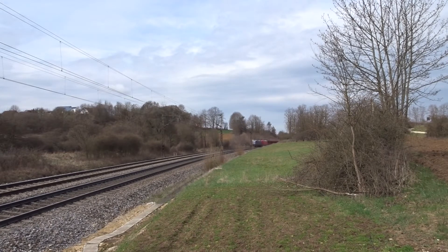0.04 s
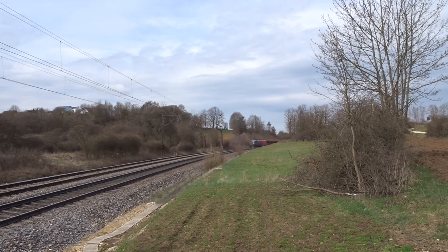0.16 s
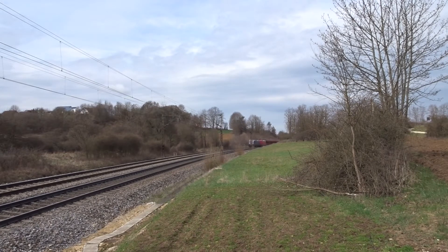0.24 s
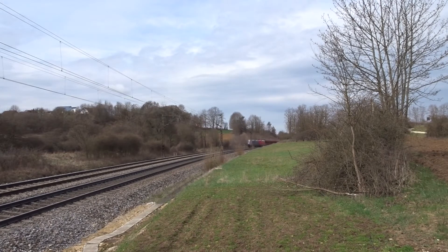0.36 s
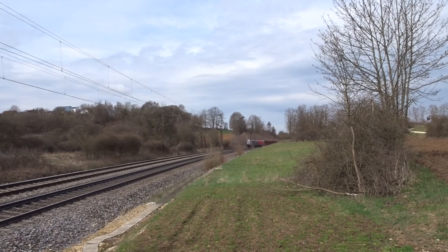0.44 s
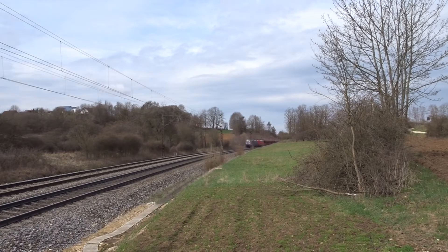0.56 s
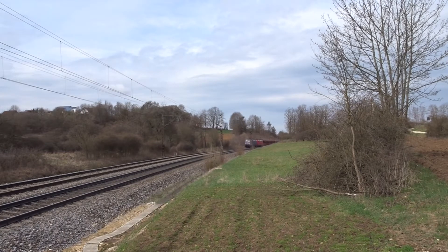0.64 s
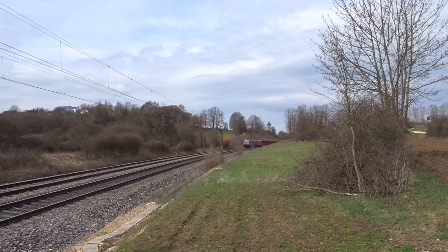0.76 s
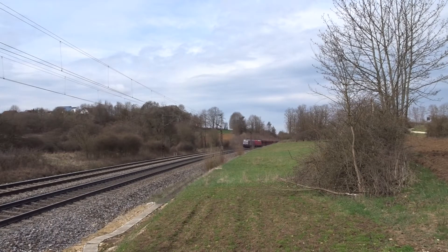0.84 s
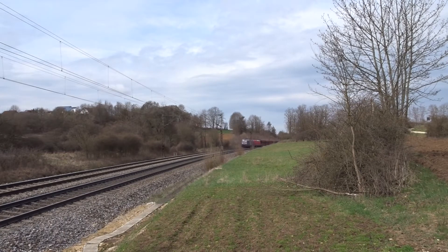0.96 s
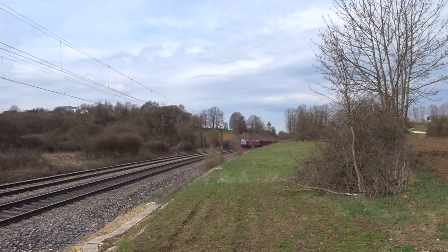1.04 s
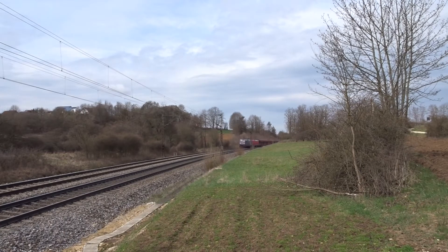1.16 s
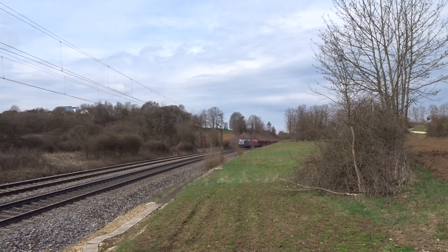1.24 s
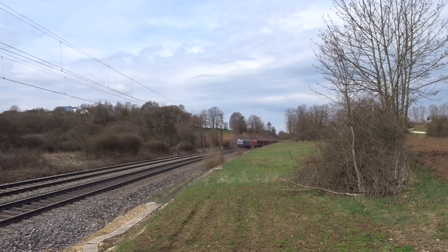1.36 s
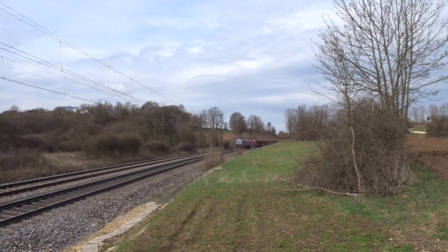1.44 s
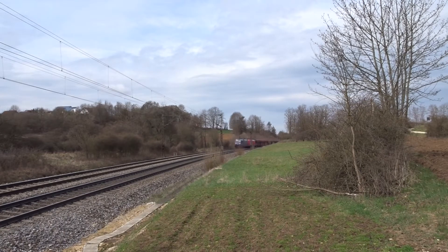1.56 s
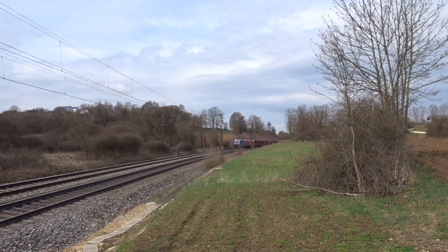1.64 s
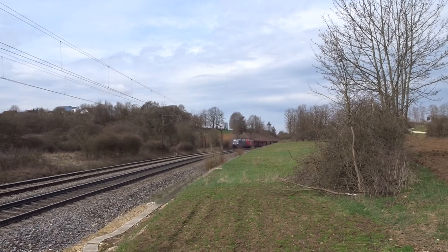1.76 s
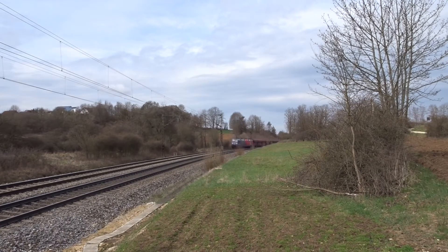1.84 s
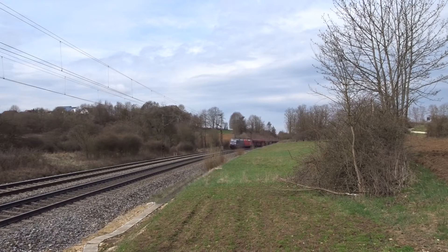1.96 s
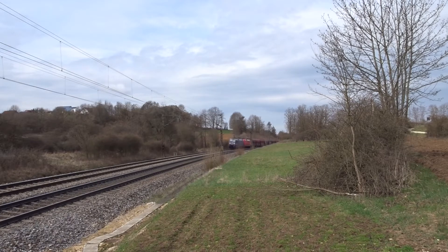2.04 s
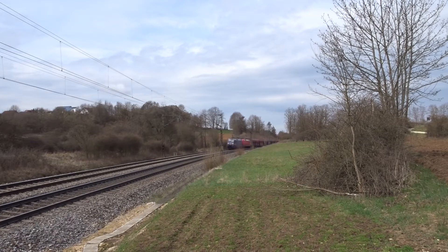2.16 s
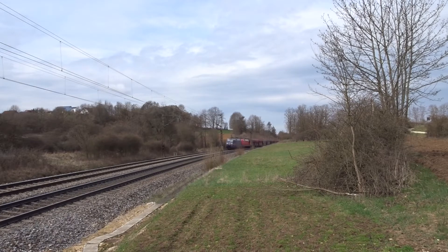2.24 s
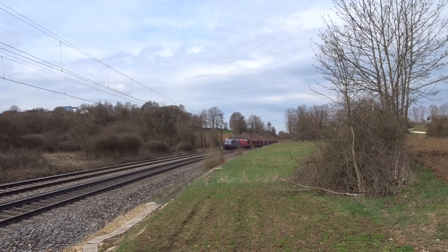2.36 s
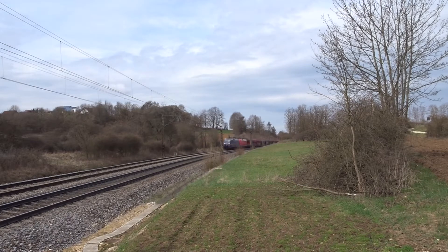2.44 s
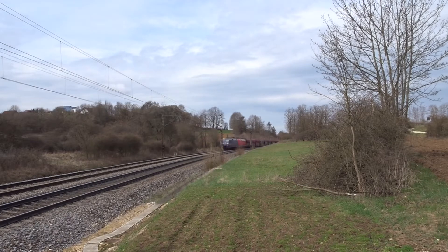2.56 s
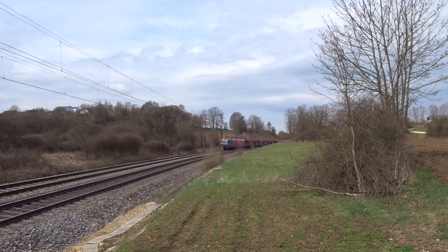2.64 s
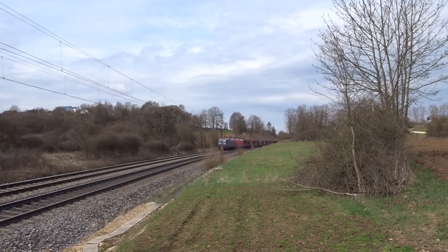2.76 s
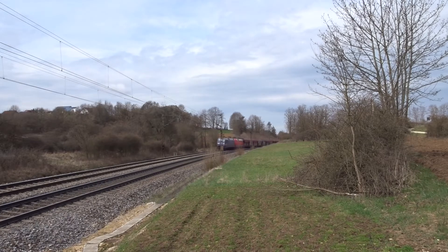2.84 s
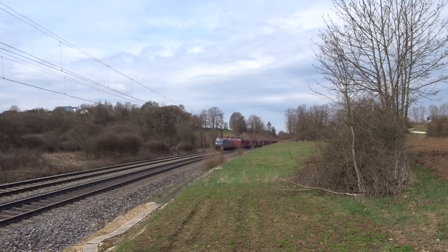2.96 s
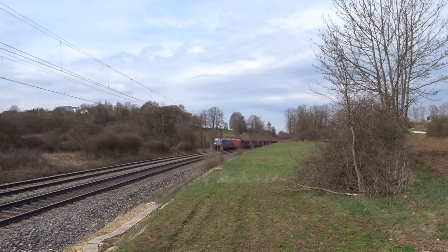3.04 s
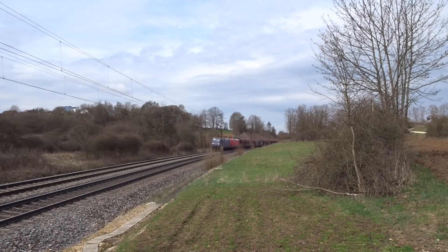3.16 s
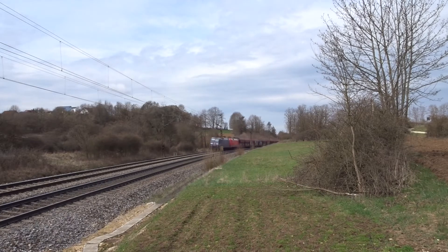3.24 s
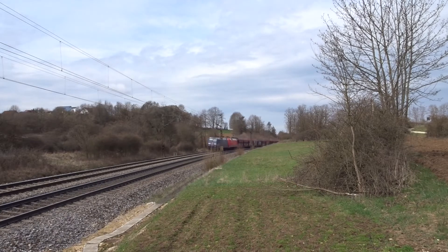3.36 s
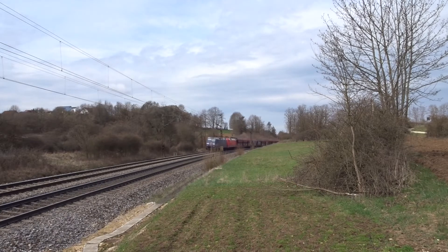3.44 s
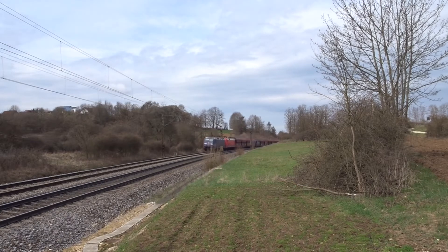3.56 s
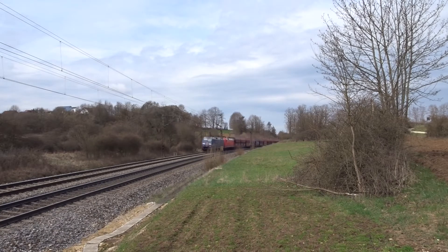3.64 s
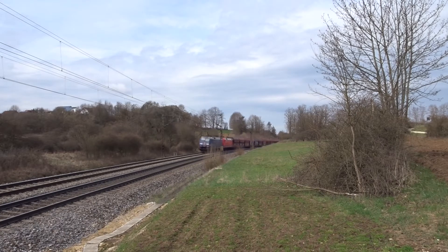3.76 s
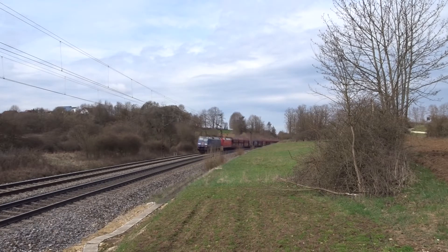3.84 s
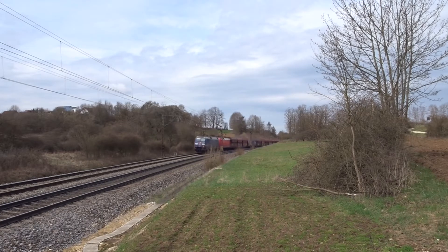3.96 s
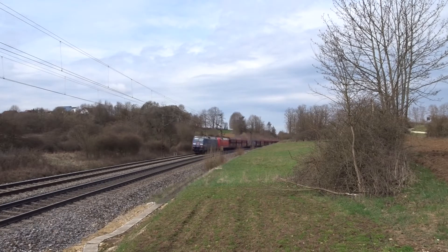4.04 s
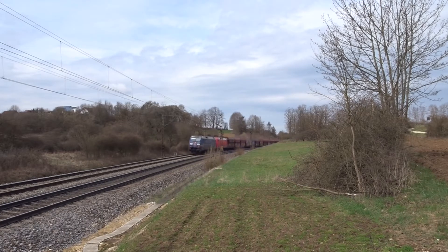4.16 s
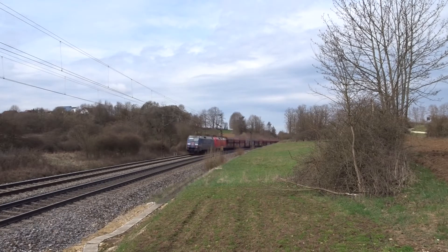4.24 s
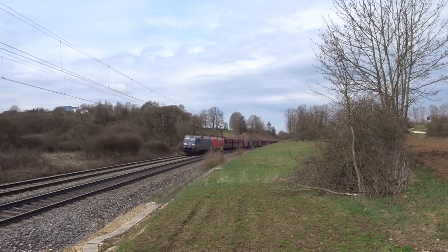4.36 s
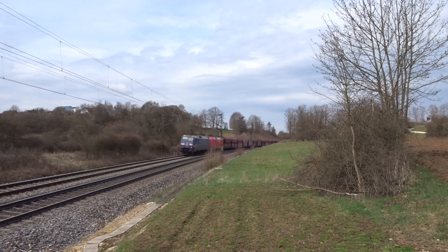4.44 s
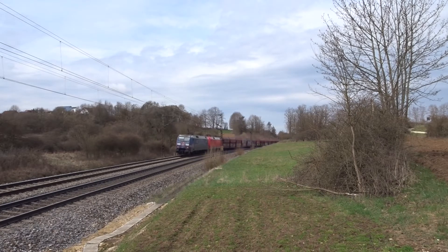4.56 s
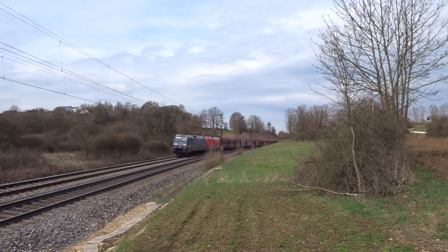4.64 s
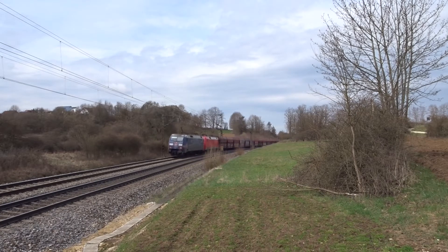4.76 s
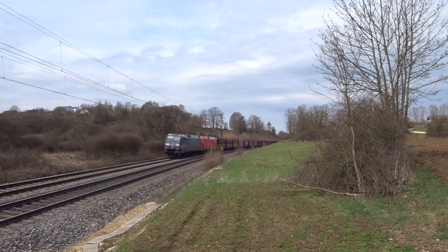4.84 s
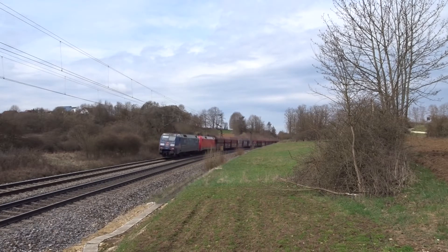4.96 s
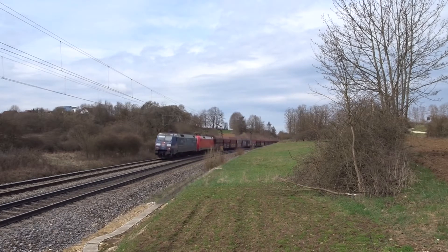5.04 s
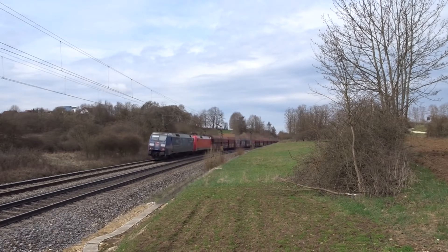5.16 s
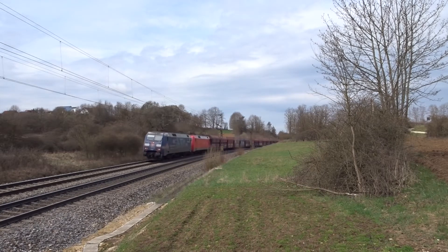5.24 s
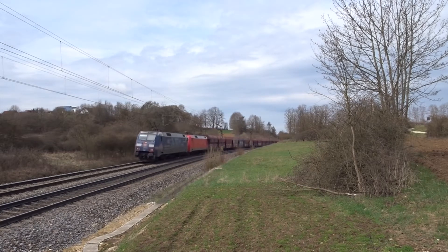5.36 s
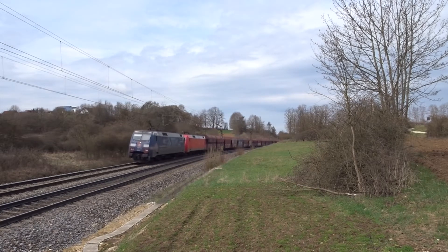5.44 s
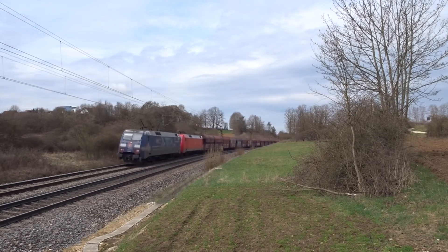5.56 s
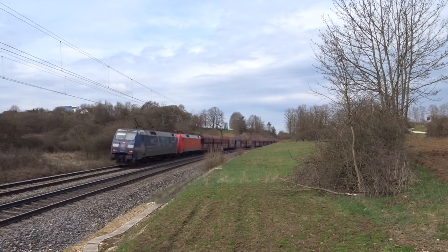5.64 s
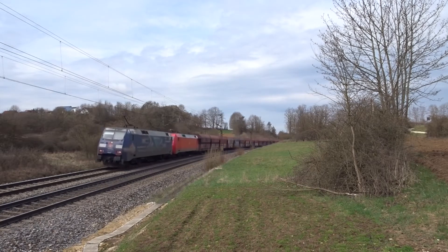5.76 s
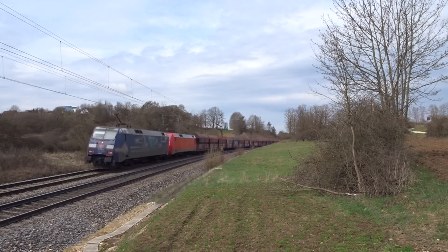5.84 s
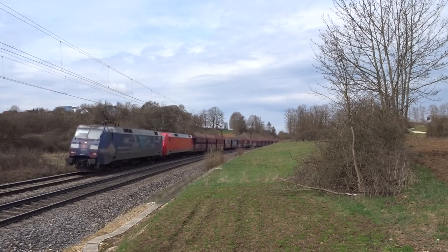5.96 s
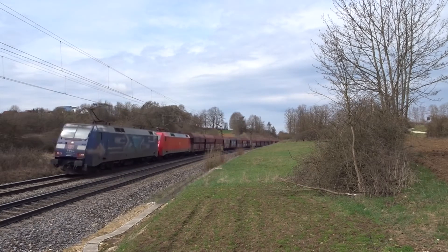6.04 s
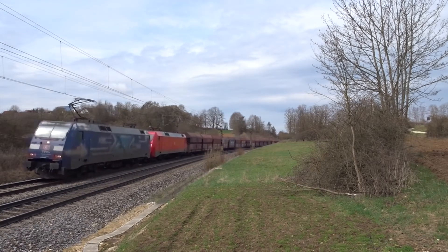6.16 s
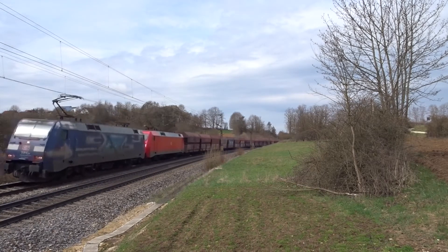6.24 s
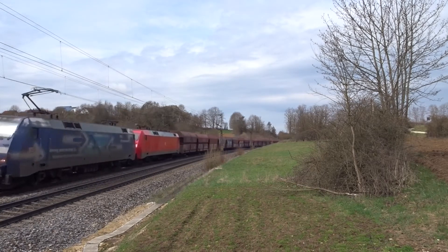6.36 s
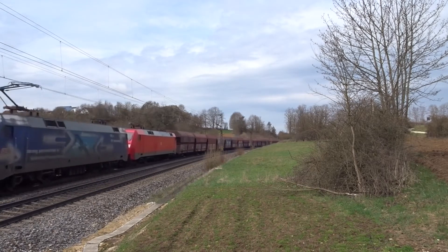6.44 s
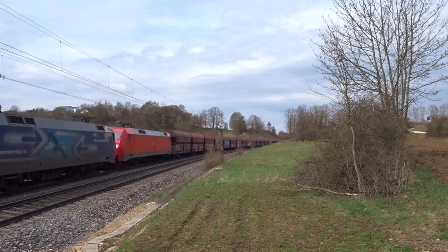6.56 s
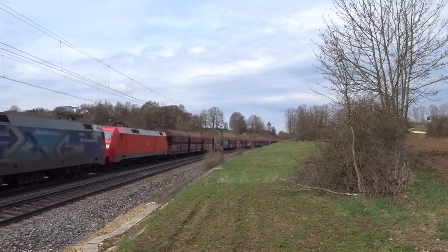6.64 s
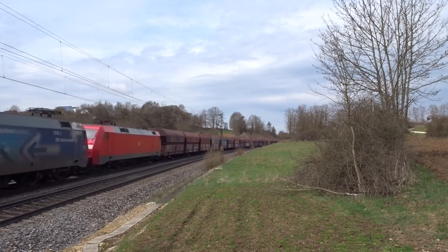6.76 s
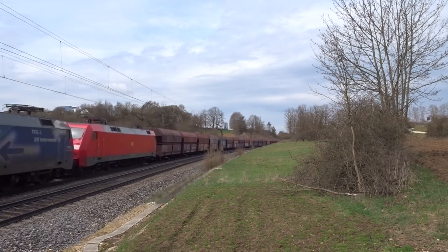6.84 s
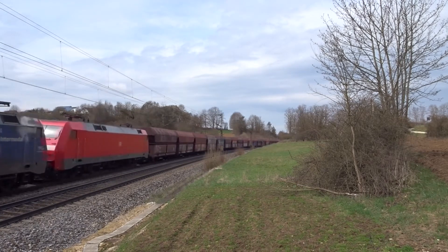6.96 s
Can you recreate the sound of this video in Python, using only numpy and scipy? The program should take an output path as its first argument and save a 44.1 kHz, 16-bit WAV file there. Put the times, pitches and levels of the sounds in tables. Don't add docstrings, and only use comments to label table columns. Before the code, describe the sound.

Wind thumps on the microphone while rails sing thinly, then an electric freight train's roar swells, knocking and hissing, moving left as it arrives.

```python
import sys
import numpy as np
from scipy import signal
from scipy.fft import rfft, irfft, next_fast_len
from scipy.io import wavfile
from scipy.ndimage import uniform_filter1d, map_coordinates

SR = 44100
rng = np.random.default_rng(int(sys.argv[2]) if len(sys.argv) > 2 else 0)


def elevation(decibels):
    levels = np.asarray(decibels, float)
    return 10 ** (levels / 20)


def master(y):
    cut = np.clip(np.atleast_2d(y).T, -1, 1)
    pcm = np.round(cut * 32767)
    wavfile.write(sys.argv[1], SR, pcm.astype(np.int16))


N = 308700
TIME_S = np.arange(N) / SR
PORT_SIDE = np.array([[.5], [-.5]])

# time in seconds, rolling noise level in dB.
APPROACH = [(0, -44.5), (.6, -43.5), (2.46, -42), (3.4, -39.5), (4.3, -37.5), (4.9, -34), (5.55, -31),
            (6.28, -23.5), (7, -19)]
# frequency in Hz, likeness of the two ports from 0 to 1,
# lead of the left in radians, left over right in dB.
FAR_PORTS = [(60, .9995, 0, 0), (300, .995, .04, 0), (900, .97, .1, -1), (1200, .9, .7, 5),
             (1500, .9, .15, -1), (3000, .8, .2, -1), (4200, .6, .3, -1), (4900, .95, .1, 0),
             (6000, .3, 1, -1)]
# frequency in Hz, level in dB per Hz.
LOW_SHAKE = [(25, -13), (60, -5), (110, -2), (220, -9.5), (320, -20), (500, -30)]


def unit(x):
    return x / np.sqrt(np.mean(x ** 2) + 1e-20)


def along(points, hz):
    f, *cols = np.transpose(points)
    return [np.interp(np.log(hz + 1), np.log(f + 1), c) for c in cols]


def curves(rows):
    s, *cols = np.transpose(rows)
    return [np.interp(TIME_S, s, c) for c in cols]


def wobble(rate):
    knots = rng.standard_normal(int(N * rate / SR) + 4)
    return map_coordinates(knots, [np.arange(N) * rate / SR])


def bump(s, half_s):
    return np.exp(-((TIME_S - s) / half_s) ** 2)


def swell(s, length_s, power):
    u = np.linspace(0, 1, 41)
    return np.interp(TIME_S, s + length_s * u, np.abs(np.sin(np.pi * u)) ** power, left=0, right=0)


def colour(points):
    return lambda hz: elevation(along(points, hz)[0]) * (hz > points[0][0]) * (hz < points[-1][0])


def bands(modes):
    def gain(hz):
        return np.sqrt(sum(elevation(2 * db) / (1 + ((hz - c) / w) ** 2 / 2) ** 3 for c, w, db in modes))
    return gain


def at_ports(three, gain, ports):
    m = next_fast_len(N + 8192)
    hz = np.fft.rfftfreq(m, 1 / SR)
    alike, lead, db = along(ports, hz)
    alike = np.clip(alike, 0, 1)
    z = rfft(three, m) * gain(hz)
    shared = np.sqrt(alike) * z[0] * np.exp(1j * lead * PORT_SIDE)
    mix = shared + np.sqrt(1 - alike) * z[1:]
    return irfft(mix * elevation(db * PORT_SIDE), m)[:, :N]


def rush(gain, ports, patchy_db):
    z = signal.stft(rng.standard_normal((3, N)), nperseg=512)[2]
    patches = uniform_filter1d(rng.standard_normal(z.shape[1:]), 8, 0)
    patches = uniform_filter1d(patches, 10, 1)
    noise = signal.istft(z * elevation(patchy_db * unit(patches)), nperseg=512)[1][:, :N]
    return unit(at_ports(noise, gain, ports))


def tone(hz, width_hz, clean):
    clean = np.clip(clean, 0, 1)
    noise = unit(wobble(width_hz)) + 1j * unit(wobble(width_hz))
    size = np.sqrt(clean) + np.sqrt((1 - clean) / 2) * noise
    return np.sqrt(2) * size * np.exp(2j * np.pi * np.cumsum(hz + np.zeros(N)) / SR)


def placed(line, lead, db):
    return np.real(line * np.exp(1j * lead * PORT_SIDE)) * elevation(db * PORT_SIDE)


def nearness():
    far_db, span_db = -44, 24
    return np.clip((curves(APPROACH)[0] - far_db) / span_db, 0, 1)


def rail_dropout_db():
    # time in seconds, depth in dB, half length in seconds.
    dips = [(0.868, 5, 0.021), (2.308, 6, .015), (2.428, 7, 0.014), (2.754, 12, 0.066), (3.086, 6, 0.012),
            (3.173, 7, 0.034), (5.88, 10, .03), (5.98, 7, 0.028), (6.444, 2, 0.091), (6.87, 35, 0.046)]
    return sum(db * bump(s, half_s) for s, db, half_s in dips)


def field():
    # frequency in Hz, level in dB per Hz.
    murmur = [(45, -8), (90, -2), (300, -18.5), (600, -1.5), (900, -8), (1600, -10)]
    return elevation(-46) * rush(colour(murmur), FAR_PORTS, patchy_db=1.5)


def wind():
    # start in seconds, length in seconds, level in dB.
    gusts = [(0.087, 0.28, -28.5), (0.57, 0.19, -26), (0.751, .21, -24), (1.003, 0.18, -27),
             (1.317, 0.072, -49), (1.503, 0.39, -39), (2.002, 0.13, -39.5), (2.28, .1, -62),
             (4.512, 0.15, -32), (5.358, 0.34, -34), (5.76, 0.31, -26), (6.024, 0.18, -32)]
    # time in seconds, peak in dB, pitch in Hz, sign and size of the swing.
    pops = [
        (0.176, -16.5, 111, -0.87),
        (0.2683, -11.5, 278, 0.64),
        (0.311, -25, 250, 0.91),
        (0.3245, -16, 157, 1),
        (0.577, -18.5, 203, 0.77),
        (0.682, -25, 170, -1.4),
        (0.6925, -23, 130, 0.66),
        (1.1, -17.5, 170, 0.83),
        (1.133, -22, 150, 1),
    ]
    ports = [(30, .99, 0, 0), (120, .82, .3, 0), (300, .5, .5, 0)]
    gust = sum(elevation(db) * swell(s, length_s, power=0.37) for s, length_s, db in gusts)
    lumps = elevation(1.1 * wobble(45) + 1.4 * wobble(23))
    buffet = gust * unit(lumps * rush(colour(LOW_SHAKE), ports, patchy_db=2.0))
    eddies = np.zeros(N)
    for s, db, hz, sign in pops:
        start = round(s * SR) - 900
        u = 2 * np.pi * hz * (TIME_S[start:][:1800] - s)
        eddies[start:][:1800] += sign * elevation(db) * np.sin(u) * np.exp(-(u / 3.45) ** 2) * 1.15
    return .7 * buffet + eddies * elevation([[-2.5], [2]])


def rolling():
    # frequency in Hz, level in dB per Hz.
    far_roar = [(25, -12), (53, -7), (104, -11.5), (146, -16.5), (248, -9.5), (341, -18.5), (420, -20),
                (550, -12), (660, -17.5), (779, -10), (958, -14.5), (1210, -8.5), (1820, -18), (2450, -16),
                (7200, -40)]
    near_roar = [(28, -28), (55, -5), (200, -8), (600, -4.5), (1500, -9.5), (2600, -6), (3200, -20.5),
                 (5000, -28), (7000, -36)]
    # frequency in Hz, likeness from 0 to 1, left lead in radians, left over right in dB.
    near_ports = [(60, .999, .02, 0), (200, .995, .08, .5), (500, .97, .35, 3.5), (2200, .82, 1, 7),
                  (3500, .6, 1.3, 3), (5000, .65, 2.3, 3)]
    level_db, = curves(APPROACH)
    near = nearness()
    far_part = np.sqrt(1 - near) * elevation(6.0) * rush(colour(far_roar), FAR_PORTS, patchy_db=-0.57)
    near_part = np.sqrt(near) * elevation(1.0) * rush(colour(near_roar), near_ports, patchy_db=0.7)
    onset = np.clip(8 * (TIME_S - 6.1), 0, 1)
    rumble = onset * elevation(-38.5 + 2.5 * wobble(9)) * rush(colour(LOW_SHAKE), near_ports, patchy_db=0.5)
    return elevation(level_db + 0.31 * wobble(12)) * (far_part + near_part) + rumble


def wheel_hiss():
    # frequency in Hz, level in dB per Hz.
    spectrum = [(2500, -12), (3500, -4), (5000, -3.5), (7200, 4), (8100, -2), (8800, 0.5), (9500, -2.5),
                (10000, 1), (10600, 2), (11400, 1.5), (12500, -5.5), (13500, -5), (14000, -5),
                (14600, -6.5), (15700, -12)]
    # frequency in Hz, likeness from 0 to 1, left lead in radians, left over right in dB.
    ports = [(2500, 0.66, .4, -2), (3330, 1, 0.44, 5.5), (3900, 0.99, 1.7, 3), (5300, 0.4, 2, 1.5),
             (6550, 0.94, 2.2, 0.5), (7660, 0.85, 4.4, -5.5), (8930, 0.7, 5.84, -2), (10280, 0.62, 4.5, 0),
             (14800, 0.54, 7.8, 2)]
    short = np.clip(.75 - nearness(), 0, 1)
    hiss_db = -29.5 - 59 * short ** 1.74 - 0.3 * rail_dropout_db() * (0.46 + short)
    return elevation(hiss_db + 10.5 + 0.8 * wobble(14)) * rush(colour(spectrum), ports, patchy_db=1.0)


def knocks():
    # time in seconds, peak in dB.
    hits = [(4.355, -18.5), (4.698, -17), (4.7167, -17), (4.7686, -21), (4.817, -14), (4.8288, -12),
            (5.0429, -16), (5.1008, -22), (5.1506, -11.5), (5.1644, -15), (5.487, -10), (6.01, -23)]
    x, t = np.zeros((3, N)), np.arange(SR // 20) / SR
    burst = t / .0022 * np.exp(1 - t / .0022)
    rattle = elevation(-14 - 60 * t / .09)
    for s, db in hits:
        grains = rng.standard_normal((3, len(t)))
        x[:, round(s * SR):][:, :len(t)] += elevation(db - 11.5) * (burst + rattle) * grains
    spectrum = colour([(800, -19), (2000, 12), (5500, 3.0), (9000, -10), (15000, -16)])
    return at_ports(x, spectrum, [(800, 0.18, 0.61, 1.5), (9000, 0.35, 2.3, 0.5)])


def passing_ring(ahead_db, hz, width_hz, peak_db, peak_s):
    since = TIME_S - peak_s
    rise_db = np.maximum(17 * since, ahead_db + 4 * since)
    fall_db = -23 * since
    level = elevation(peak_db + np.minimum(rise_db, fall_db))
    return placed(level * tone(hz, width_hz, clean=0.77), lead=0.11 + hz[0] / 2200, db=1.5)


def wheels_and_motor():
    # frequency in Hz, width in Hz, peak in dB, loudest moment in seconds.
    wheel_modes = [
        (1558, 30, -25.5, 6.93),
        (2045, 24, -27, 6.7),
        (2580, 26, -30.5, 6.27),
    ]
    gears = [
        (248.7, 8, -26, 6.82),
        (412, 8, -29, 6.61),
    ]
    # time in seconds, pitch ratio.
    pitch_drop = [(6.2, 1), (6.5, .994), (6.8, .979), (7, .96)]
    # time in seconds, rise in dB, half length in seconds.
    clear_moments = [
        (4.75, 2, 0.14),
        (5.15, 10, 0.11),
        (6.968, 7.5, 0.089),
    ]
    doppler, = curves(pitch_drop)
    rings = sum(passing_ring(-12, hz * doppler, *row) for hz, *row in wheel_modes)
    rings = rings + sum(passing_ring(-23, hz * np.sqrt(doppler), *row) for hz, *row in gears)
    clear = np.clip(TIME_S - 3.6, .2, 1) * elevation(sum(db * bump(s, half_s) for s, db, half_s in clear_moments))
    hum = 0.57 * clear * tone(795 * doppler, width_hz=7, clean=1.0)
    hum = hum + 0.55 * tone(775, width_hz=70, clean=0.01)
    return rings + placed(elevation(-43.5 + 17 * nearness()) * hum, lead=0.2, db=2.0)


def rail_singing():
    # time in seconds, level in dB.
    vibration = [(0, -38), (.4, -39), (.8, -36), (.95, -33), (1.5, -32.5), (2, -36), (2.28, -34),
                 (2.55, -31.5), (3.02, -26), (3.6, -29.5), (3.85, -27.5), (4.23, -28.5), (4.44, -22),
                 (4.75, -24), (5.1, -29.5), (5.5, -23.5), (6.1, -22), (7, -32)]
    # frequency in Hz, width in Hz, level in dB.
    low_modes = [(5520, 100, -3), (6250, 1300, -17.5), (6700, 160, -8), (6940, 200, 4.5), (7310, 100, 4.5),
                 (7580, 130, -4)]
    high_modes = [(8590, 150, -22), (9540, 81, -11), (10100, 110, -17.5), (10920, 140, -1.5),
                  (10950, 130, -8), (11960, 180, -6), (12340, 200, 6.5), (12860, 160, 2.5),
                  (13100, 230, -2.5), (13600, 170, -2), (15100, 300, -11.5), (15300, 230, -7),
                  (15600, 200, -9)]
    # frequency in Hz, level in dB.
    sharp_modes = [(10910, -11), (11215, -12.5), (11760, -13), (12060, -23), (12280, -19), (12600, -21),
                   (12780, -9), (13190, -22)]
    # frequency in Hz, likeness from 0 to 1, left lead in radians, left over right in dB.
    ports = [(5500, 0.55, 3.3, 1), (6000, 0.22, 5.6, -3), (6500, 1, 3.47, -3), (7360, 0.92, 4.02, -8.5),
             (7600, 0.99, 4.47, 1), (9500, 0.63, 5.3, -12), (10500, 1, 6.28, -5), (15000, 0.6, 6.28, 6)]
    sing_db, = curves(vibration)
    drop_db = rail_dropout_db()
    near = nearness()
    high_db = sing_db - drop_db
    low_db = -52.5 + 0.12 * (sing_db + 36.5) + 17.5 * near ** 0.33
    low_db = low_db - 0.58 * (1 - near) * drop_db + 1.36 * wobble(7.5)
    flicker = 0.67 * wobble(14) + 0.47 * wobble(40)
    high = elevation(high_db - 1.66 + flicker) * rush(bands(high_modes), ports, patchy_db=1.0)
    low = elevation(low_db + 6.5 + 0.3 * flicker) * rush(bands(low_modes), ports, patchy_db=-0.5)
    lines = sum(elevation(db + 0.7 * wobble(2.17)) * np.real(tone(hz, 45, clean=0.038)) for hz, db in sharp_modes)
    return high + low + elevation(high_db - 8.0 + flicker) * lines


def rail_whine():
    # start in seconds, length in seconds, whine level in dB, side tone level in dB.
    whine_beats = [(-.06, 0.2, -42, -55), (0.167, 0.12, -47, -53), (0.36, .24, -39, -63),
                   (0.613, 0.15, -39, -58), (.81, 0.15, -39, -52), (.97, 0.21, -38, -55),
                   (1.215, .11, -42, -55), (1.327, 0.48, -40.5, -50), (1.84, 0.085, -38, -35),
                   (1.944, 0.11, -41, -51), (2.05, 0.41, -37.5, -43), (2.456, 0.31, -34.5, -36.5),
                   (2.74, 0.23, -40.5, -38), (2.94, .25, -39, -35), (3.24, 0.19, -40, -37.5),
                   (3.433, 0.13, -35, -33), (3.594, 0.31, -35.5, -33), (4.006, 0.21, -32, -33),
                   (4.18, .3, -38, -30.5), (4.547, 0.39, -49, -32), (4.97, 0.33, -31, -27),
                   (5.324, 0.18, -30, -31), (5.55, 0.27, -36, -30.5), (5.835, 0.25, -27.5, -33),
                   (6.103, 0.18, -28.5, -45), (6.453, 0.23, -30, -44), (6.924, .16, -42, -43)]
    # time in seconds, pitch in Hz.
    pitch = [(0, 1197), (1, 1204), (1.7, 1209), (2.5, 1209), (3.4, 1212), (4.1, 1205), (4.5, 1210),
             (5, 1206), (6, 1201), (7, 1204)]
    sleeper_hz = 43.65
    rest = elevation(-69 + 5 * nearness())
    swells = sum(elevation([[db], [side_db]]) * swell(s, length_s, power=0.32)
                 for s, length_s, db, side_db in whine_beats)
    gain, side = rest + swells
    hz, = curves(pitch)
    whine = gain * tone(hz, width_hz=12, clean=0.82)
    upper = side * elevation(-7.0) * tone(hz + sleeper_hz, width_hz=15, clean=0.42)
    lower = side * elevation(-11.0) * tone(hz - sleeper_hz, width_hz=20, clean=0.21)
    return placed(whine + upper + lower, lead=1.0, db=6.5)


def scene():
    background = field() + wind()
    train = rolling() + wheel_hiss() + knocks() + wheels_and_motor()
    return background + train + rail_singing() + rail_whine()


def band_limit(x):
    return signal.sosfilt(signal.butter(12, 17080, fs=SR, output="sos"), x)


def record(dry):
    mid, side = (dry[0] + dry[1]) / 2, (dry[0] - dry[1]) / 2
    hz, t, z = signal.stft([mid, side], SR, nperseg=1024)
    kept = rng.random((len(hz) // 14 + 1, len(t) // 4 + 1)) < .16
    kept = np.kron(kept, np.ones((14, 4)))[:len(hz), :len(t)]
    z[1] *= kept + (hz < 9650)[:, None] > 0
    power = uniform_filter1d(uniform_filter1d(np.abs(z) ** 2, 5, 1), 2, 2)
    ungated = (hz < 7750) | (hz > 10600)
    z *= (power > elevation(2 * -72.8)) + ungated[:, None] > 0
    z = z * (hz < 15750)[:, None]
    mid, side = signal.istft(z, SR, nperseg=1024)[1][:, :N]
    return band_limit(np.array([mid + side, mid - side]))


dry = scene()
out = record(dry)
master(out)
```